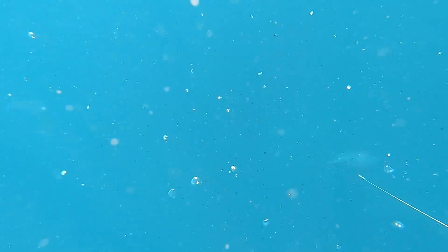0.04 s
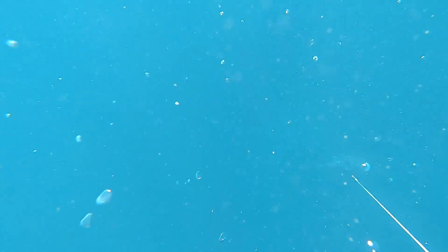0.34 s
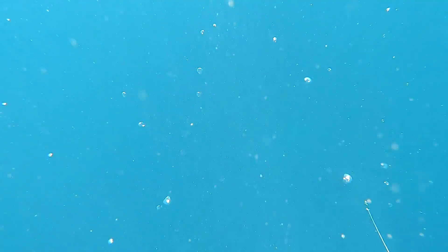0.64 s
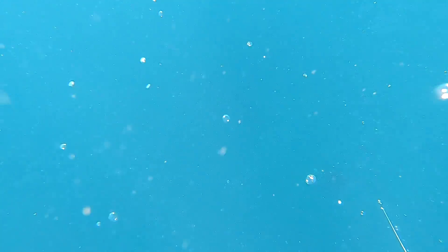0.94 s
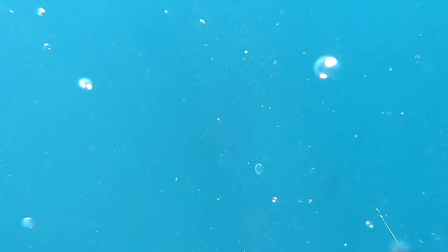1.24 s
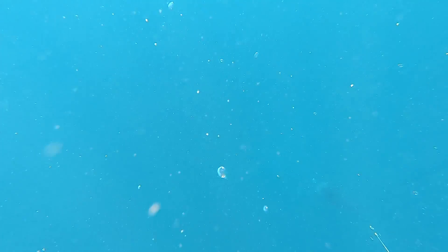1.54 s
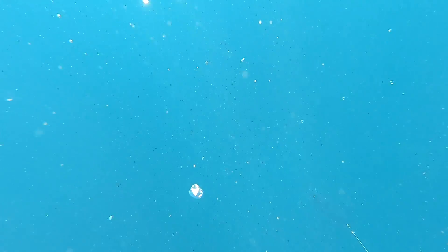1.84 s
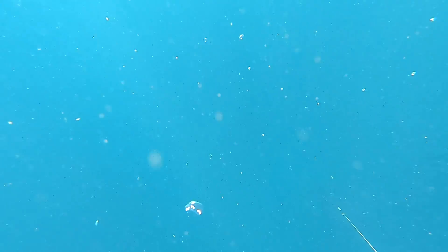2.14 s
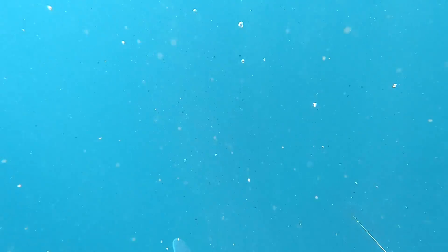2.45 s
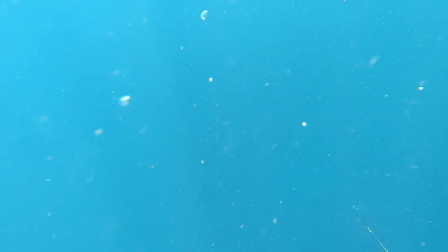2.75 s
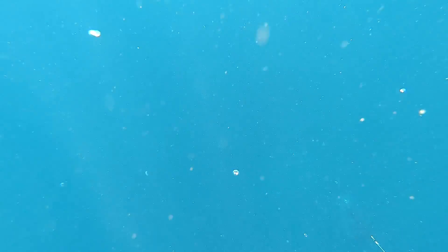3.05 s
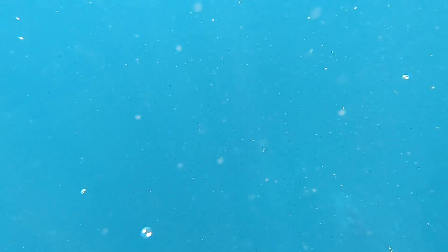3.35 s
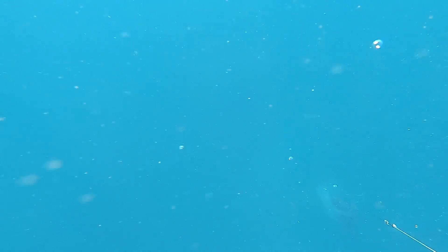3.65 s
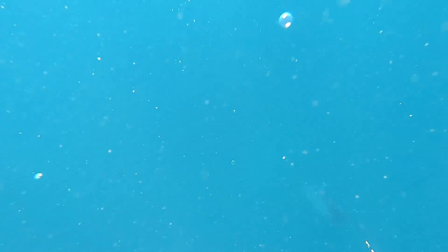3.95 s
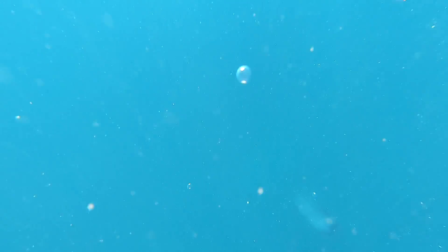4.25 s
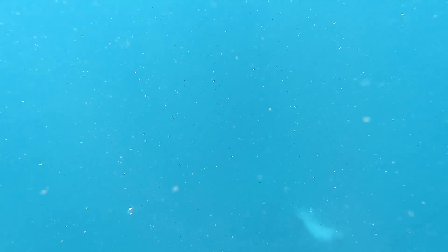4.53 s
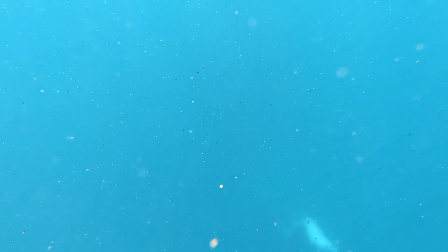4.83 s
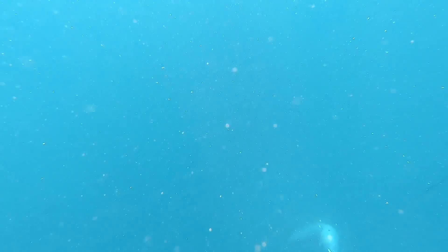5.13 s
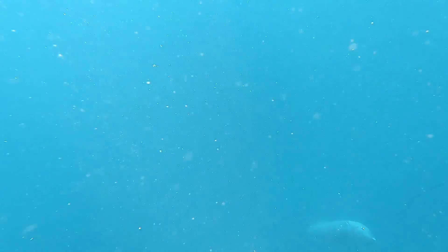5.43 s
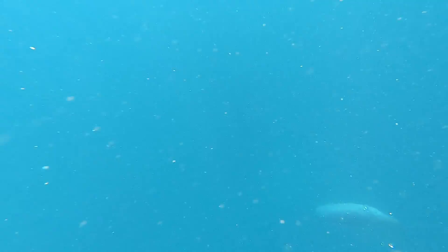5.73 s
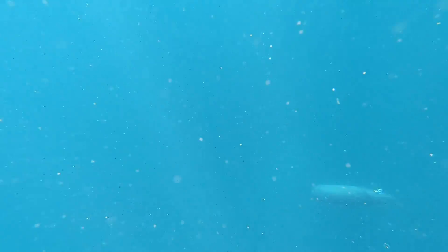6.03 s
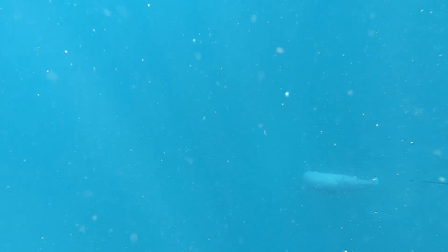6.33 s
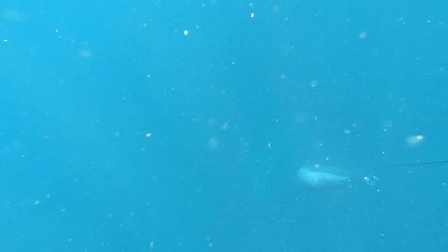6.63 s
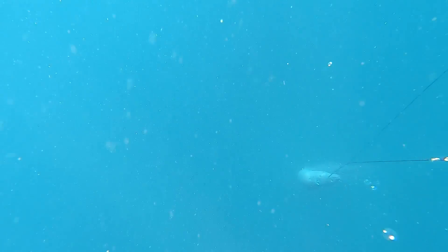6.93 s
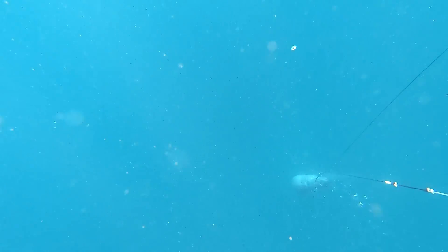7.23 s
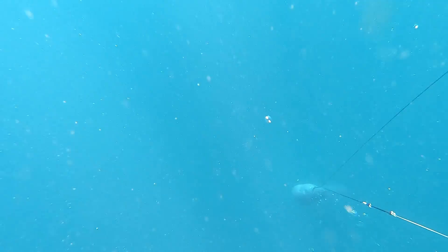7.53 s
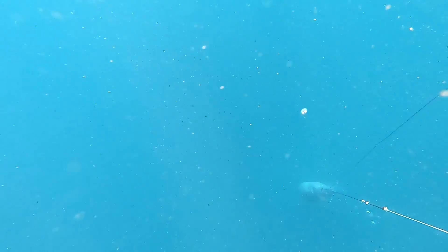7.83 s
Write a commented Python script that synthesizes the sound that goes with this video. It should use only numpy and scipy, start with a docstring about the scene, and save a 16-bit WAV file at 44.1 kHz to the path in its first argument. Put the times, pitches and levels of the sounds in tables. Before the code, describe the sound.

Close underwater gurgles and ringing bubble plips come in uneven clusters, picked up inside a camera housing pulled through the open sea. Small knocks from the tow line, a few short creaks and occasional sharp snaps mix in with them. Underneath, a low hum of flowing water swells and sinks, along with faint high crackling. A dense flurry comes early, scattered bursts follow, and brighter plips stand out toward the end as the hum weakens.

```python
"""Bubbles around a towed housing

A sealed camera housing is towed through the open sea on a fishing line. Turbulence drives its resonances
into a drone, and tiny clicks crackle in the treble. The line knocks on the wall and creaks by stick-slip
friction. Pockets of air break up in bursts, and single bubbles pinch off and ring as damped
oscillators, most of them with rising pitch."""
import sys
import numpy as np
from scipy import signal
from scipy.fft import rfft, irfft, next_fast_len
from scipy.io import wavfile
from scipy.ndimage import uniform_filter1d

SR = 44100
rng = np.random.default_rng(int(sys.argv[2]) if len(sys.argv) > 2 else 0)


def store_wav(level_fs):
    """Save 16-bit WAV to argv[1]."""
    pcm = np.round(np.clip(np.atleast_2d(level_fs), -1, 1) * 32767)
    wavfile.write(sys.argv[1], SR, pcm.T.astype(np.int16))


N = 356328
TIME = np.arange(N) / SR

# Levels in the tables are relative: each source applies its own gain to them.
# water streaming past the housing: time_s, level_db
FLOW_LEVEL = [(0.0, -56.5), (0.34, -53.5), (0.38, -65.5), (0.8, -64.5), (0.84, -57), (1.6, -47),
              (2.08, -46), (2.36, -63), (2.6, -54.5), (3.12, -53.5), (3.48, -69.5), (4.0, -49.5),
              (4.48, -60), (4.9, -53.5), (5.72, -62), (6.16, -77.5), (6.4, -62), (6.52, -76), (7.14, -65.5),
              (8.06, -62)]
# housing resonances driven by the stream: pitch_hz, nominal_width_hz, level_db
DRONE_MODES = [(168.5, 30, 7.5), (210.8, 16, 0.5), (710, 40, -14), (1540, 18, -24.5), (3100, 150, -40)]
# strength of the fine crackle: time_s, level_db
CRACKLE_LEVEL = [(0.0, -76.5), (0.29, -84), (1.06, -84.5), (1.35, -79), (2.2, -89), (3.02, -82),
                 (3.42, -88.5), (4.05, -81.5), (4.82, -86), (5.26, -78), (5.76, -84), (6.1, -76.5),
                 (6.25, -84), (7.02, -85.5), (7.36, -89.5), (8.08, -89.5)]
# sharp snaps close by: start_s, level_db
CLOSE_SNAPS = [(1.256, -53.5), (1.555, -50), (1.5702, -42.5), (1.672, -51.5), (2.876, -57), (4.013, -55),
               (4.545, -60), (5.2894, -68.5), (5.4041, -56), (5.944, -67), (6.6584, -60), (7.192, -59.5),
               (7.327, -59.5)]
# tugs of the line on the housing: start_s, level_db, bass_re_wall_db
LINE_KNOCKS = [(0.188, -40, 3.5), (0.891, -44, 3.5), (1.079, -54.5, 11.5), (1.268, -30, -16.5),
               (1.384, -48, 3), (1.409, -34.5, 0.5), (1.557, -39, -10.5), (1.572, -41.5, 13.5),
               (1.627, -43.5, 6), (1.675, -34.5, -3.5), (2.995, -45, -13), (3.07, -46, -3),
               (3.259, -54.5, -24), (3.307, -54, -2), (3.419, -46, -15), (3.656, -51.5, 1.5),
               (3.738, -52.5, 1), (3.828, -51, 5.5), (4.295, -42.5, 3.5), (4.421, -49, -3),
               (4.544, -38, -9), (4.581, -55.5, 13.5), (4.671, -41.5, -23), (4.983, -57, 5),
               (5.593, -46.5, -30), (6.257, -32, -7.5), (6.269, -36.5, -8), (6.455, -34, -10.5),
               (6.668, -49, 7), (6.689, -44.5, 0.5), (6.767, -48, -23), (6.994, -46, -3.5),
               (7.012, -50.5, 4), (7.040, -43, -1), (7.110, -39.5, -2.5), (7.143, -49.5, -6),
               (7.188, -41.5, -23), (7.553, -44, 10)]
# the line sticks and slips: start_s, end_s, slips_per_s, first_slip_db, last_slip_db, bass_re_wall_db
LINE_CREAKS = [(0.949, .994, 103, -51, -47, 3.5), (1.010, 1.049, 126, -48.5, -46.5, 4),
               (3.62, 3.646, 290, -69, -87, 4), (7.765, 7.923, 107.6, -58.5, -50.5, 0.5)]
# wall resonances rung by a knock: pitch_hz, width_hz, level_db
WALL_MODES = [(463, 140, -12.5), (884, 190, -2.5), (1166, 520, 7), (1614, 110, -3)]
# pockets of air break up: start_s, length_s, mid_bubbles_db, small_bubbles_db, water_shove_db
AIR_BURSTS = [(0.0, 0.03, -45, -72, -55.5), (0.182, 0.074, -51, -70, -55), (0.843, .22, -60, -84, -62),
              (1.234, 0.083, -42.5, -67, -46.5), (1.371, 0.098, -39, -64, -53.5),
              (1.552, 0.028, -37, -54.5, -41.5), (1.668, 0.064, -40, -73, -47.5),
              (1.776, 0.14, -63, -104, -47), (1.983, .1, -76, -105, -57), (2.81, .15, -55, -78, -80),
              (2.99, 0.091, -46.5, -79.5, -71), (3.616, 0.014, -51, -75, -85),
              (4.277, 0.015, -57, -95, -70), (4.421, 0.019, -69.5, -72.5, -59),
              (4.535, 0.064, -50.5, -81, -87), (4.66, 0.086, -49.5, -80.5, -60.5),
              (4.781, 0.1, -56.5, -78, -67.5), (5.168, 0.033, -54.5, -97, -56.5),
              (5.618, 0.18, -50, -76.5, -69), (5.942, 0.008, -49, -67, -66), (6.255, 0.06, -44, -69.5, -59),
              (6.402, 0.074, -59, -84, -81), (6.659, 0.025, -49, -77, -82.5),
              (6.754, 0.013, -75, -79.5, -58), (7.144, 0.036, -56, -73, -63),
              (7.292, 0.062, -48, -72.5, -64), (7.416, .02, -56.5, -77, -73),
              (7.549, 0.049, -48.5, -77.5, -52.5), (7.644, .24, -55.5, -100, -67.5),
              (8.06, 0.032, -49.5, -81, -51)]
# single bubbles pinch off: start_s, pitch_hz, level_db, t60_s, relative_rise_per_s
NEAR_BUBBLES = [(0.012, 565, -36, 0.027, 9.5), (0.189, 462, -35, .048, 15), (0.223, 3020, -52.5, .065, 5),
                (0.253, 168, -37, 0.0054, 0), (1.266, 1427, -24, 0.038, 10), (1.290, 4070, -54, 0.048, 6),
                (1.383, 2196, -48.5, 0.29, -1), (1.406, 1070, -25.5, 0.039, 20.5),
                (1.443, 1760, -30, .021, -1), (1.471, 1418, -27, 0.069, 4), (1.532, 437, -26, 0.19, 1.5),
                (1.552, 3960, -46.5, .11, 1), (1.556, 1662, -32.5, .008, 23.5),
                (1.573, 390, -24.5, 0.0041, 13), (1.626, 429, -35, 0.16, 2.5),
                (1.673, 1987, -28.5, .023, 3.5), (1.701, 145.9, -28.5, 0.23, 7),
                (1.720, 3330, -44.5, .025, 5), (1.739, 111, -23.5, 0.042, 9.5),
                (1.747, 1074, -37, 0.056, -5.5), (1.752, 462, -39, 0.17, 1.5),
                (1.885, 1646, -50, 0.079, -1), (1.961, 111, -31.5, 0.071, -12),
                (2.366, 154, -40, 0.049, 10), (2.930, 565, -57, 0.98, 0.5), (3.007, 572, -43, 0.24, 6),
                (3.044, 741, -38.5, 0.16, 3.5), (3.070, 770, -35, 0.087, 3.5), (3.070, 1366, -37, .085, 1),
                (3.422, 215, -36, 0.04, -6.5), (3.429, 459, -39.5, 0.049, 7), (4.421, 3160, -53, 0.02, 0),
                (4.542, 2670, -34.5, 0.016, 7), (4.543, 3890, -54.5, 0.049, 1.5),
                (4.585, 520, -44, 0.07, 4), (4.674, 1563, -35, 0.059, 1), (4.719, 874, -35, 0.15, 3.5),
                (4.734, 878, -27, 0.0068, 17), (4.919, 950, -39.5, .014, 34), (5.076, 170, -36.5, 0.036, 7),
                (5.188, 1050, -24, .0085, 23), (5.636, 996, -26.5, 0.008, 12),
                (5.638, 179, -27.5, 0.045, 10), (5.68, 927, -31.5, 0.017, 10),
                (5.678, 178, -27.5, 0.042, 18.5), (5.782, 1060, -41.5, .11, 2),
                (5.942, 2900, -43.5, 0.017, 6), (6.281, 1350, -39, 0.14, -2),
                (6.304, 1045, -21, 0.027, 3.5), (6.337, 1683, -34.5, 0.023, 4),
                (6.347, 933, -38.5, 0.11, 4), (6.666, 1070, -24.5, 0.021, -4.5),
                (7.040, 3020, -47, 0.013, -10), (7.193, 1475, -19.5, 0.016, -10.5),
                (7.316, 1677, -23.5, .025, 17), (7.33, 1616, -30.5, 0.054, 0),
                (7.43, 974, -22, 0.057, 11.5), (7.436, 2800, -54, 0.024, 2), (7.554, 160, -33.5, 0.022, -4)]
# spectra of eddies, clicks, snaps, middle-sized and small bubbles: frequency_hz, density_db
EDDY_SPECTRUM = [(22, -1.5), (70, -1.5), (110, -3.5), (200, -19.5), (500, -42.5)]
CRACKLE_SPECTRUM = [(1500, -23.5), (2500, -9.5), (3200, -3), (4100, -5), (5000, -5), (6300, 5),
                    (6900, -5.5), (8100, -5.5), (8800, -14), (10000, -19.5), (11000, -24), (12700, -24),
                    (14000, -58.5)]
SNAP_SPECTRUM = [(2000, -8.5), (4000, 1.5), (6200, 8.5), (8200, -4.5), (9500, -8), (13000, -24.5),
                 (16000, -25)]
GURGLE_SPECTRUM = [(280, -22), (480, -4.5), (800, 1.5), (1600, 2), (1900, -6.5), (2400, -24), (3500, -43.5)]
FIZZ_SPECTRUM = [(1700, -9), (2200, 1.5), (3200, 2), (4100, -10), (5000, -9.5), (8300, -15.5), (10000, -28),
                 (14000, -33.5)]
# phase of the left side ahead of the right once they part: frequency_hz, lead_rad
LEFT_LEAD = [(30, .17), (200, 0.17), (380, 1.5), (650, 1.86), (900, 1), (1150, 4.44), (1350, 4.3),
             (1700, 4.98), (2700, 4.95), (4000, 4.97), (6200, 5.4)]
# balance of the middle tones once the sides part: time_s, left_minus_right_db
MID_BALANCE = [(4.6, 1), (5.7, 2.5), (7.1, 2.5), (7.19, 9.5), (7.3, 0)]


def from_db(db):
    """Amplitude ratio: a factor of ten for every 20 dB."""
    return 10 ** (np.asarray(db) / 20)


def rms_one(x):
    """Normalisation to unit mean power."""
    return x / np.sqrt(np.mean(x ** 2) + 1e-20)


def level(curve):
    """Amplitude envelope interpolated from rows of time_s, level_db."""
    return from_db(np.interp(TIME, *np.transpose(curve)))


def wander(spread_db, per_s):
    """Random amplitude modulation: the level glides between Gaussian values."""
    knots_s = np.arange(0, 9, 1 / per_s)
    return from_db(spread_db * np.interp(TIME, knots_s, rng.standard_normal(len(knots_s))))


def add(out, start_s, sound):
    """Superposition: a sound adds to the mix from its start time."""
    i = int(np.clip(round(start_s * SR), 0, N - 1))
    out[..., i:i + sound.shape[-1]] += sound[..., :N - i]


def coloured(x, spectrum):
    """Minimum-phase filtering: a one-sided cepstrum shapes the spectrum causally; rms 1."""
    size = 2 * next_fast_len(N // 2 + 4096)
    hz, db = np.transpose(spectrum)
    freq = np.maximum(np.arange(size // 2 + 1) * SR / size, 1)
    skirts = np.maximum(freq / hz[-1], 1) * np.maximum(hz[0] / freq, 1)   # 6 dB per octave past the ends
    magnitude = from_db(np.interp(np.log(freq), np.log(hz), db)) / skirts
    cepstrum = irfft(np.log(magnitude))
    response = np.exp(rfft(2 * cepstrum[:size // 2], size))
    return rms_one(irfft(rfft(x, size) * response)[:N])


def resonate(x, hz, width_hz):
    """Second-order resonance with unit gain at its peak."""
    r = np.exp(-np.pi * width_hz / SR)
    feedback = [1, -2 * r * np.cos(2 * np.pi * hz / SR), r * r]
    return signal.lfilter(np.array([1, 0, -1]) * (1 - r * r) / 2, feedback, x)


def lowpass(x, hz, order):
    """Butterworth low-pass: maximally flat below the cutoff."""
    return signal.sosfilt(signal.butter(order, hz, fs=SR, output="sos"), x)


def evened(x, window_s):
    """Division by the running rms takes the slow swings out of a random signal."""
    window = int(window_s * SR)
    power = uniform_filter1d(uniform_filter1d(x * x, window), window)
    return x / np.sqrt(np.maximum(power, 0) + np.mean(x * x) / 100)


def with_flow(base_db, exponent, cruise_db=-59.5):
    """Power law: a gain follows the flow, relative to its level at ordinary towing speed."""
    return from_db(base_db) * (level(FLOW_LEVEL) / from_db(cruise_db)) ** exponent


def stream(surging, drone_db=1.5, surge_db=8.0):
    """Forced vibration: turbulence drives the housing's modes; eddies press in lumps, so it throbs."""
    turbulence = rng.standard_normal(N)
    drone = sum(from_db(db) * resonate(resonate(turbulence, hz, 2 * width), hz, 2 * width)
                for hz, width, db in DRONE_MODES)
    eddies = evened(coloured(rng.standard_normal(N), EDDY_SPECTRUM), window_s=0.065)
    lumps = rms_one(wander(spread_db=1, per_s=9))
    throbbing = rms_one(np.sqrt(lumps)) * evened(drone, window_s=0.2)
    return from_db(drone_db) * level(FLOW_LEVEL) * throbbing + from_db(surge_db) * surging * lumps * eddies


def crackle(gain_db=6.5, per_s=190, spread_db=5.2, click_s=.0005, hiss=.33, apart=0.084):
    """Shot noise: clusters of tiny unequal clicks ring the thin wall, over a faint hiss; stereo."""
    clusters = wander(spread_db=5, per_s=25)
    sizes = from_db(spread_db * np.minimum(rng.exponential(1, N), 3.5)) * rng.choice([-1, 1], N)
    impulses = rms_one(sizes * (rng.random(N) < clusters * per_s / SR))
    energy = signal.lfilter([1], [1, -np.exp(-1 / (click_s * SR))], impulses ** 2 + 1e-18)
    clicks = rms_one(np.sqrt(energy) * rng.standard_normal(N))
    shared = clicks + hiss * rng.standard_normal(N)
    sides = [coloured(shared + apart * rng.standard_normal(N), CRACKLE_SPECTRUM) for _ in range(2)]
    return from_db(gain_db) * level(CRACKLE_LEVEL) * np.array(sides)


def snaps(gain_db=3.5, decay_s=0.0041):
    """Broadband transients: close, bright bursts of noise decay exponentially."""
    out, t = np.zeros(N), np.arange(SR // 80) / SR
    for start_s, db in CLOSE_SNAPS:
        add(out, start_s, from_db(db) * rms_one(rng.standard_normal(len(t)) * np.exp(-t / decay_s)))
    out = coloured(out, SNAP_SPECTRUM)
    peak_rms = np.sqrt(uniform_filter1d(out * out, SR // 1000).max())   # the loudest millisecond
    return from_db(max(db for _, db in CLOSE_SNAPS) + gain_db) * out / peak_rms


def tug(rub=0.067, rub_s=0.0069):
    """Impulsive force: a jerk, then brief friction as the line settles."""
    t = np.arange(SR // 16) / SR
    return signal.unit_impulse(len(t)) + rub * rng.standard_normal(len(t)) * np.exp(-t / rub_s)


def knock(force, db, bass_db, bass_delay_s=.0015, wall_top_hz=1810, leak_db=-36):
    """Modal response: the wall rings at once, then the whole housing bounces on the line in the bass."""
    modes = sum(from_db(mode_db) * resonate(force, hz, width) for hz, width, mode_db in WALL_MODES)
    wall = lowpass(modes, wall_top_hz, order=12) + from_db(leak_db) * modes
    shove = signal.unit_impulse(len(force), int(bass_delay_s * SR))
    body = lowpass(resonate(shove, hz=152, width_hz=130), 640, order=2)
    gain = np.sqrt(SR / 100) * from_db(db)   # db is the wall's energy spread over 10 ms
    return gain * (wall / np.linalg.norm(wall) + from_db(bass_db) * body / np.linalg.norm(body))


def wind_up(out, end_s, db, offset_db=-18, length_s=.022, growth_s=0.0061):
    """Exponential build-up: adds the soft scrape that leads into a knock or a pinch-off."""
    t = np.arange(SR // 16) / SR
    growth = np.exp(np.minimum(t - length_s, 0) / growth_s) * (t < length_s)
    force = rng.standard_normal(len(t)) * growth
    add(out, end_s - length_s, knock(force, db + offset_db, bass_db=-11))


def tow_line(knock_db=-1.5, creak_db=5.5, jitter=.03, variation=.2):
    """Impact and stick-slip friction: single tugs knock, runs of nearly alike slips creak."""
    out = np.zeros(N)
    for start_s, db, bass_db in LINE_KNOCKS:
        wind_up(out, start_s, db)
        add(out, start_s, knock(tug(), db + knock_db, bass_db))
    for start_s, end_s, per_s, first_db, last_db, bass_db in LINE_CREAKS:
        slips = np.arange(start_s, end_s, 1 / per_s)
        force = tug(rub=.08)
        for due_s, db in zip(slips, np.linspace(first_db, last_db, len(slips))):
            slip_s = due_s + jitter * rng.standard_normal() / per_s
            add(out, slip_s, knock(force + variation * tug(), db + creak_db, bass_db))
    return out


def burst_envelope(levels_db, attack_db_per_s=897.5, release_db_per_s=504, wake_db=-6, wake_db_per_s=150):
    """Incoherent sources add in power: each burst flares, holds, drops and leaves a fading wake."""
    power = np.zeros(N)
    for (start_s, length_s, *_), db in zip(AIR_BURSTS, levels_db):
        before, after = np.maximum(start_s - TIME, 0), np.maximum(TIME - start_s - length_s, 0)
        fall_db = np.maximum(-release_db_per_s * after, wake_db - wake_db_per_s * after)
        shape_db = fall_db - attack_db_per_s * before
        heard = shape_db > -70
        power[heard] += from_db(db + shape_db[heard]) ** 2
    return np.sqrt(power)


def bubble(hz, swell_s, t60_s, rise_per_s):
    """Damped oscillator: a pinched-off bubble swells, rings and dies away as its pitch glides."""
    t = np.arange(int((swell_s + t60_s * 1.2) * SR) + 2) / SR
    swell = np.minimum(t / max(swell_s, 1e-4), 1)
    decay = from_db(-60 * np.maximum(t - swell_s, 0) / t60_s)
    return swell * decay * np.sin(2 * np.pi * hz * (t + rise_per_s * t * t / 2))


def swarm(gain, spectrum, low_hz, high_hz, per_s, cycles, spread_db, rise_per_s, wash, calm_db):
    """Random superposition: bubbles of many sizes ring in bursts; in the calm, far ones blur to a wash."""
    far = coloured(rng.standard_normal(N), spectrum)
    near = np.zeros(N)
    for when, pitch, strength, ring in rng.random((int(per_s * N / SR), 4)):
        hz = low_hz * (high_hz / low_hz) ** pitch
        t60_s = cycles / hz * 2 ** (2 * ring - 1)
        height = from_db(-spread_db * np.log(max(strength, .03)))
        add(near, when * N / SR, height * bubble(hz, 1 / hz, t60_s, rise_per_s))
    near = evened(coloured(near, spectrum), window_s=0.058)
    activity = gain ** 2 / (gain ** 2 + from_db(calm_db) ** 2)
    return gain * (activity * near + wash * far)


def wobbled(sound, depth_db=3.0, per_s=170):
    """Shape oscillation: a bubble flexes as it rises, so its level flutters at random."""
    wobbles = np.arange(len(sound)) / SR * per_s
    flex = np.interp(wobbles, np.arange(256), rng.standard_normal(256))
    return sound * from_db(depth_db * np.minimum(wobbles / 2, 1) * flex)


def single_bubbles(gain_db=4.5, jolt_db=-24, neck_db=-13, wall_corner_hz=120):
    """Pinch-off: each near bubble strains at its neck, jolts the housing and rings freely."""
    out = np.zeros(N)
    for start_s, hz, db, t60_s, rise_per_s in NEAR_BUBBLES:
        swell_s = .0018 * np.sqrt(1000 / hz)   # larger bubbles take longer
        add(out, start_s, from_db(db + gain_db) * wobbled(bubble(hz, swell_s, t60_s, rise_per_s)))
        wall_db = db - 20 * np.log10(1 + (wall_corner_hz / hz) ** 2)   # low ones are too slow to ring it
        add(out, start_s, knock(tug(), wall_db + jolt_db, bass_db=-6))
        wind_up(out, start_s, wall_db + neck_db)
    return out


def two_sides(x, parting_s=4.38, fade_s=.003):
    """Phase and level differences: from parting_s the housing's sides swing out of step above the bass."""
    freq = np.arange(N // 2 + 1) * SR / N
    lead_rad = np.interp(freq, *np.transpose(LEFT_LEAD))
    balance_db = np.interp(TIME, *np.transpose(MID_BALANCE))
    mid_band = np.interp(freq, [300, 700, 1700, 3000], [0, 1, 1, 0])
    sides = []
    for sign, channel in zip((1, -1), x):
        shifted = rfft(channel) * np.exp(.5j * sign * lead_rad)
        mid_gain = from_db(sign * balance_db / 2)
        sides.append(irfft(shifted, N) + (mid_gain - 1) * irfft(shifted * mid_band, N))
    parted = np.clip((TIME - parting_s) / fade_s, 0, 1)
    return x + parted * (np.array(sides) - x)


def scene():
    """Superposition: flow and air bursts drive swarms and rumble, and the other sources add to them."""
    _, _, gurgle_db, fizz_db, shove_db = np.transpose(AIR_BURSTS)
    gurgling = np.hypot(burst_envelope(gurgle_db), with_flow(base_db=-68.5, exponent=0.15))
    fizzing = np.hypot(burst_envelope(fizz_db), with_flow(base_db=-88.5, exponent=0.15))
    surging = np.hypot(burst_envelope(shove_db), with_flow(base_db=-73, exponent=0.82))
    gurgle = swarm(gurgling, GURGLE_SPECTRUM, low_hz=415.7, high_hz=1971, per_s=400, cycles=24,
                   spread_db=6.5, rise_per_s=4.3, wash=0.34, calm_db=-63)
    fizz = swarm(fizzing, FIZZ_SPECTRUM, low_hz=2133, high_hz=4660, per_s=520, cycles=70,
                 spread_db=9.0, rise_per_s=1.5, wash=0.18, calm_db=-78.5)
    bubbles = single_bubbles() + from_db(-1.0) * gurgle + from_db(10.5) * fizz
    return two_sides(bubbles + tow_line() + stream(surging) + crackle() + snaps())


def record(dry):
    """Band limiting: a steep Chebyshev low-pass is at least 70 dB down from 15.8 kHz."""
    return signal.sosfilt(signal.cheby2(12, 70, 15800, fs=SR, output="sos"), dry)


dry = scene()
out = record(dry)
store_wav(out)
```